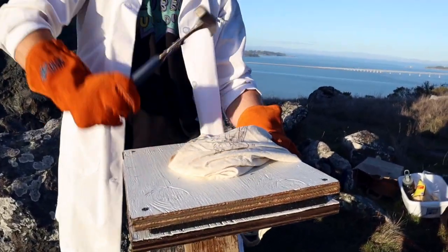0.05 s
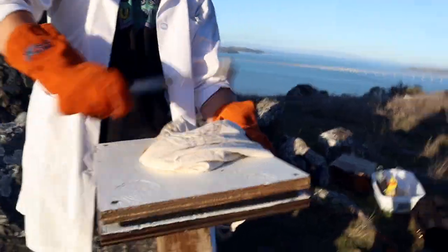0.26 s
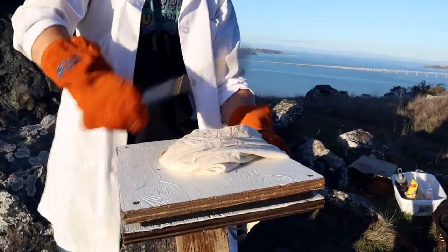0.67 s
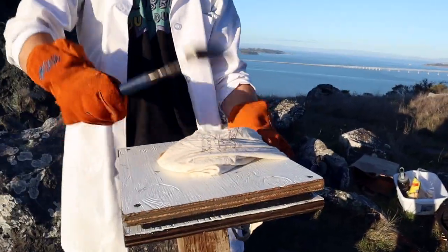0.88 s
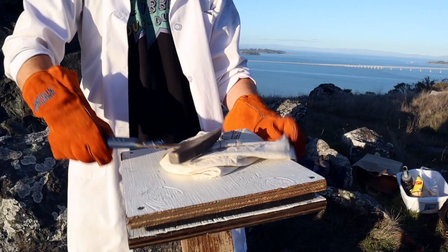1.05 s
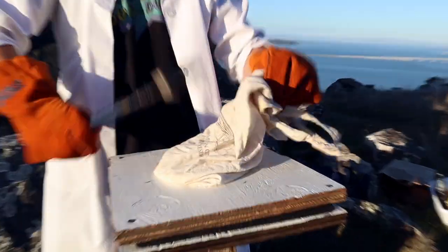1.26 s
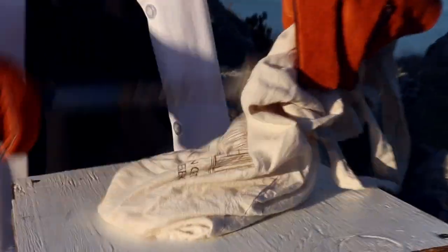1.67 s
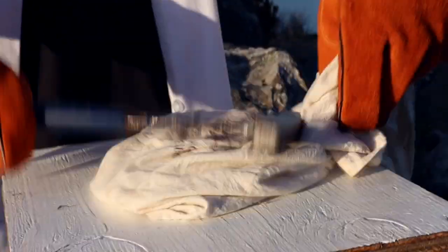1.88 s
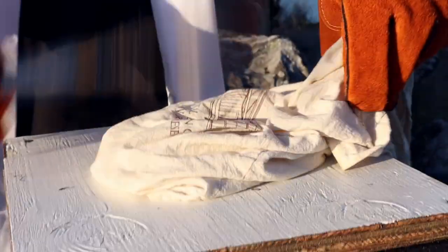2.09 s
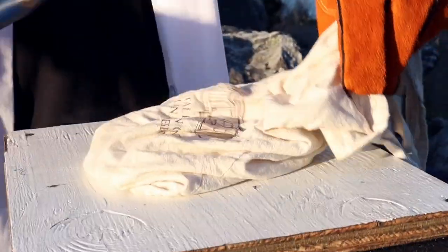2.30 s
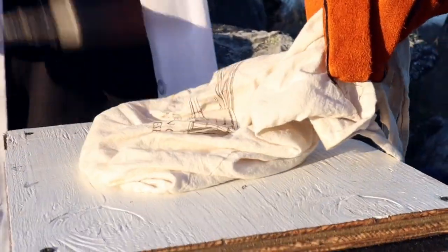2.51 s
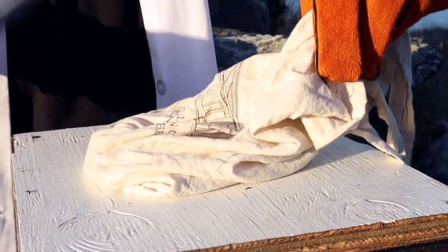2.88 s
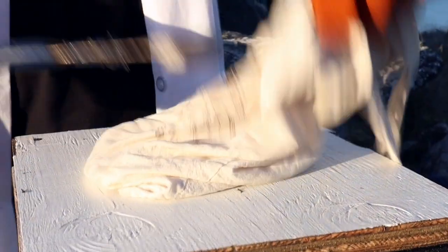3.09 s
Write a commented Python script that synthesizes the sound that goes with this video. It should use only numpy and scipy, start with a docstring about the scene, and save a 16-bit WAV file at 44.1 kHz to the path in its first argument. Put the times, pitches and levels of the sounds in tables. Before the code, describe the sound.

A hammer pounds a cloth bag of hard pieces on wooden boards, close by and outdoors. Eleven blows fall evenly from 0.2 to 3.0 seconds, about 0.28 seconds apart, the one at 1.9 much softer. Each is a wooden thud with a slight crunch and brief rattle; at 1.1 the steel head clinks. Faint wind brushes the microphone at the start, and cloth rustles softly near 3.2.

```python
"""Hammering a bag on boards.

Outdoors, a hammer pounds a cloth bag of hard pieces on stacked wooden boards, eleven times.
Each blow rings the boards and crunches the contents; the boards slap back and shudder,
the rocky ground echoes and loose pieces settle. Light wind brushes the microphone,
and the cloth rustles at the end."""
import sys
import numpy as np
from scipy import signal
from scipy.fft import rfft, irfft, next_fast_len
from scipy.io import wavfile

SR = 44100
rng = np.random.default_rng(int(sys.argv[2]) if len(sys.argv) > 2 else 0)


def generate_wav(sig):
    """Save sig (samples, or channels by samples) to the path in sys.argv[1] as 16-bit PCM at SR."""
    pcm = np.round(np.clip(np.atleast_2d(sig).T, -1, 1) * 32767).astype(np.int16)
    wavfile.write(sys.argv[1], SR, pcm)


N = 143325
TIME_S = np.arange(N) / SR


def from_db(db):
    """Decibels to gain."""
    return 10 ** (np.asarray(db) / 20)


def unit_rms(x):
    """Scale to rms 1."""
    return x / np.sqrt(np.mean(x ** 2) + 1e-20)


def envelope(points):
    """Gain over time from t/s, level/dB points."""
    return from_db(np.interp(TIME_S, *np.transpose(points)))


def noise(spectrum, grain_db=0):
    """Shaped noise, rms 1; grain_db roughens it into a crackle."""
    hz, db = np.transpose(spectrum)
    white = rng.standard_normal(N)
    grains = np.repeat(rng.standard_normal(N // 16 + 1), 16)[:N].clip(-2, 2)
    size = next_fast_len(N)
    bins_hz = np.arange(size // 2 + 1) * SR / size
    gain = from_db(np.interp(np.log(bins_hz + 1), np.log(hz), db))
    return unit_rms(irfft(rfft(white * from_db(grain_db * grains), size) * gain, size)[:N])


def burst(start_s, attack_s, decay_s):
    """Linear attack, exponential decay."""
    age_s = TIME_S - start_s
    return np.clip(age_s / attack_s, 0, 1) * np.exp(-np.clip((age_s - attack_s) / decay_s, 0, 40))


def clicks(times_s, levels_db):
    """One impulse at each time."""
    out = np.zeros(N)
    samples = (np.atleast_1d(times_s) * SR).astype(int)
    np.add.at(out, samples.clip(0, N - 1), from_db(levels_db))
    return out


def ring(drive, hz, t60_s):
    """One mode: a unit impulse starts a decaying unit sine."""
    radius = from_db(-60 / (t60_s * SR))
    angle = 2 * np.pi * hz / SR
    return signal.lfilter([0, np.sin(angle)], [1, -2 * radius * np.cos(angle), radius ** 2], drive + 1e-18)


def radiate(mode, hz, min_cut_hz=0):
    """High-pass: a mode radiates little far below its pitch."""
    return signal.sosfilt(signal.butter(2, max(min_cut_hz, 0.16 * hz), "high", fs=SR, output="sos"), mode)


# Hammer contacts, two blows double: t/s, thump/dB, body/dB, knock/dB, crack/dB, favoured f/Hz,
# boost/dB, clack f/Hz, clack/dB, crunch/dB, crunch rise/s, crunch decay/s
CONTACTS = [ (0.2157, -19.5, -3, -4.5, 11, 480, -38, 2580, -7.5, -9.5, 0.00072, 0.0028),
            (0.2191, -1, -5, 1, -19.5, 1130, 9, 1443, -4, -18.5, 0.00048, 0.00084),
            (0.4994, -8, -5, 2.5, -2, 233, 9, 1754, 0.5, -16, 0.00059, 0.005),
            (0.7942, 1, -0.5, -7, -15.5, 410, 10.5, 3100, -9, -7, 0.00046, 0.0019),
            (1.083, -4.5, -5.5, 2.5, 4.5, 702, 9.5, 1546, -7.5, -8, 0.001, 0.0013),
            (1.3750, -10, 5.5, -6.5, 4, 410, 7, 844, -1.5, -20, 0.00072, 0.0041),
            (1.6540, -12.5, -4, -4, -7, 800, -5, 1900, -15.5, -16, .0005, 0.0014),
            (1.6622, -12.5, -3.5, 3, -14.5, 1160, 5.5, 1650, -11, -15, 0.00074, 0.00083),
            (1.9212, -16.5, -29, -21.5, -21.5, 550, 7.5, 5640, -30.5, -30, 0.0063, 0.0043),
            (2.1873, -2, -3.5, 0, -1.5, 640, 3, 2034, -7.5, -17, 0.00039, 0.0034),
            (2.4569, -0.5, -5, 1.5, -10, 822, 9.5, 1565, -6, -15.5, 0.00049, 0.0029),
            (2.7390, 0.5, 8, -7.5, 3.5, 870, 6.5, 2400, -10.5, -17, .0005, 0.0056),
            (3.0275, -3.5, -12.5, -8, -27.5, 1100, -4, 1600, -32.5, -25, 0.00086, 0.0053)]
# Centres of thump, body, knock, crack: f/Hz
REGISTERS_HZ = (150, 450, 950, 2400)
# Modes of the loaded boards: f/Hz, level/dB, t60/s
BOARD_MODES = [(100, -22, 0.31), (140.4, -10, .045), (232, -16, 0.071), (415, -15.5, .03),
               (545, -30.5, .07), (611, -16.5, 0.078), (805, -14.5, 0.031), (885.5, -11.5, .025),
               (1130, -10, .022), (1348, -9, 0.015), (1693, -15, 0.036), (2400, -17, 0.0063),
               (3100, -11, 0.0045), (3590, -26, 0.013)]


def boards(max_lag_s=0.0015, favour_octaves=0.25, scatter_db=1.0):
    """Each contact drives the modes with its own balance and favours one pitch, by where it lands."""
    rows = np.array(CONTACTS)
    times_s, registers_db, favoured_hz, boost_db = rows[:, 0], rows[:, 1:5], rows[:, 5], rows[:, 6]
    out = 0
    for hz, db, t60_s in BOARD_MODES:
        balance_db = np.array([np.interp(np.log(hz), np.log(REGISTERS_HZ), row) for row in registers_db])
        favour_db = boost_db * np.exp(-(np.log2(hz / favoured_hz) / favour_octaves) ** 2)
        drive_db = db + balance_db + favour_db + scatter_db * rng.standard_normal(len(rows))
        lag_s = min(max_lag_s, 0.5 / hz) * rng.random(len(rows))
        mode = ring(clicks(times_s + lag_s, drive_db), hz, t60_s)
        out += radiate(mode, hz, min_cut_hz=150)  # small boards: little deep bass
    return out


# Crushed pieces: f/Hz, level/dB
CRUNCH_SPECTRUM = [(200, -10), (600, -3.5), (1500, 1.5), (3200, -5.5), (5200, -12), (7500, -25.5),
                   (11000, -32.5), (16000, -36)]


def contents(cloth_lead_s=0.0037, cloth_db=-12):
    """The cloth squashes, then the piece under the hammer clacks and crunches."""
    grit = noise(CRUNCH_SPECTRUM, grain_db=3.5)
    out = 0
    for t_s, *_, hz, clack_db, crunch_db, rise_s, decay_s in CONTACTS:
        clack = radiate(ring(clicks(t_s, clack_db), hz, t60_s=0.014), hz)
        squash = from_db(cloth_db) * burst(t_s - cloth_lead_s, 0.005, 0.0027)
        crunch = burst(t_s, rise_s, decay_s)
        out += clack + grit * from_db(crunch_db) * (squash + crunch)
    return out


# Blows that ring the head: t/s, level/dB
HEAD_STRIKES = [(.7935, -16), (1.0832, 3.5), (1.375, -13), (2.739, -24)]
# Head modes: f/Hz, level/dB, t60/s
HEAD_MODES = [(3763, -25, .052), (8270, -46, .07)]


def hammer_head():
    """The steel head rings briefly on some blows."""
    times_s, strike_db = np.transpose(HEAD_STRIKES)
    return sum(ring(clicks(times_s, strike_db + db), hz, t60_s) for hz, db, t60_s in HEAD_MODES)


# Board rebounds: t/s, slap/dB, shudder/dB, echo/dB
REBOUNDS = [(0.231, -24.5, -40, -46.5), (0.51, -13.5, -35.5, -46), (0.81, -20, -35, -49),
            (1.094, -23.5, -36, -44.5), (1.385, -25.5, -42.5, -50), (1.669, -24.5, -40, -48.5),
            (1.939, -31.5, -45.5, -49.5), (2.201, -24, -35.5, -45), (2.472, -26.5, -37.5, -50.5),
            (2.755, -20, -35.5, -41.5), (3.043, -20.5, -33.5, -48.5)]
# Board on board: f/Hz, level/dB
SLAP_SPECTRUM = [(70, -25), (110, -21), (300, -4.5), (570, 8), (850, -4.5), (1400, -7), (3000, -20),
                 (6000, -38), (15000, -57.5)]


def slap(decay_s=0.0079):
    """The boards slap together after each blow."""
    gain = sum(from_db(db) * burst(t_s, 0.002, decay_s) for t_s, db, _, _ in REBOUNDS)
    return gain * noise(SLAP_SPECTRUM, grain_db=2)


HUM_HZ, HUM_T60_S = 539, 0.07
# Shuddering boards: f/Hz, level/dB
SHUDDER_SPECTRUM = [(40, -17.5), (108, 5), (170, 3.5), (320, -1.5), (560, -4), (800, -14.5), (1350, -18),
                    (2200, -34.5), (6000, -50), (15000, -60)]


def shudder(decay_s=0.067, hum_db=-5.5):
    """The boards rattle on, one mode humming."""
    gain = sum(from_db(db) * burst(t_s - 0.008, 0.012, decay_s) for t_s, _, db, _ in REBOUNDS)
    hum = from_db(hum_db) * unit_rms(ring(rng.standard_normal(N), HUM_HZ, HUM_T60_S))
    return gain * (noise(SHUDDER_SPECTRUM, grain_db=9.5) + hum)


# Pieces dropping in the bag: t/s, level/dB, f/Hz, board knock/dB
DROPS = [(.039, -41, 1200, -54), (.084, -46, 1800, -58), (.319, -42, 1400, -50), (.528, -26, 1250, -32),
         (.642, -48, 2200, -54), (.851, -39, 2200, -46), (1.159, -33, 1700, -35), (1.201, -33, 1420, -39),
         (1.284, -50, 1420, -56), (1.718, -45, 1400, -50), (2.014, -46, 1600, -46), (2.258, -37, 1450, -39),
         (2.292, -37, 1560, -42), (2.524, -39, 1400, -41), (2.556, -44, 1400, -46), (2.806, -34, 1300, -26),
         (2.887, -48, 1400, -39), (3.089, -39, 1300, -39)]
# Modes of a piece: frequency ratio, level/dB
PIECE_MODES = [(.78, -7), (1, 0), (1.2, -9)]
# Grit of a drop: f/Hz, level/dB
DROP_SPECTRUM = [(150, 10.5), (550, 17), (850, 7), (1500, -6), (3000, -16.5), (6000, -27.5), (15000, -60.5)]


def settling(muffle_hz=2600):
    """Gritty knocks, each ringing one piece and the board under it, muffled by the cloth."""
    grit = noise(DROP_SPECTRUM, grain_db=6.5)
    out = 0
    for t_s, db, hz, board_db in DROPS:
        out += from_db(db) * grit * burst(t_s, 0.0013, 0.007)
        out += ring(clicks(t_s, board_db), HUM_HZ, HUM_T60_S)
        for k, (ratio, mode_db) in enumerate(PIECE_MODES):
            out += (-1) ** k * ring(clicks(t_s, db + mode_db), hz * ratio, t60_s=0.036)
    return signal.sosfilt(signal.butter(2, muffle_hz, fs=SR, output="sos"), out)


def trickle(rate_per_s=360, spread_db=4, re_shudder_db=-18, decay_s=0.041):
    """Crumbs shift after each blow and come to rest."""
    gain = sum(from_db(db + re_shudder_db) * burst(t_s + 0.03, 0.035, decay_s)
               for t_s, _, db, _ in REBOUNDS)
    grains = (rng.random(N) < rate_per_s / SR) * rng.choice([-1, 1], N)
    grains = grains * from_db(spread_db * rng.standard_normal(N).clip(-2, 2))
    pitches_hz = np.geomspace(900, 3200, 12)
    pitch_index = rng.integers(0, len(pitches_hz), N)
    crumbs = sum(ring(grains * (pitch_index == k) / hz, hz, t60_s=0.043) for k, hz in enumerate(pitches_hz))
    return gain * unit_rms(crumbs)


# Return from the rocks: f/Hz, level/dB
ECHO_SPECTRUM = [(150, 0.5), (550, 10.5), (900, -0.5), (2000, -9), (4000, -16.5), (6000, -17.5),
                 (9000, -27), (15000, -32.5)]


def rock_echo(delay_s=0.045, decay_s=0.023):
    """The rocky ground scatters each blow back as a noise burst."""
    gain = sum(from_db(db) * burst(t_s + delay_s, 0.002, decay_s) for t_s, _, _, db in REBOUNDS)
    return gain * noise(ECHO_SPECTRUM, grain_db=4.5)


# Fabric snapping taut: t/s, level/dB
SNAPS = [(.134, -50), (.141, -42), (2.154, -55), (2.437, -45)]
# Snap: f/Hz, level/dB
SNAP_SPECTRUM = [(700, -20), (1500, -3), (2400, 0), (4500, -3), (8000, -8), (11000, -25), (16000, -35)]
# Bag shifting: t/s, level/dB
SHIFT_ENVELOPE = [(0, -49), (.15, -55.5), (.42, -73), (.58, -48), (.75, -69), (.9, -52), (1.05, -62.5),
                  (1.3, -59.5), (1.6, -82.5), (3.25, -77.5)]
# Shift: f/Hz, level/dB
SHIFT_SPECTRUM = [(150, 16), (500, 14.5), (1300, 6), (2500, -6), (6000, -22.5), (9000, -29), (15000, -41.5)]
# Fabric sliding: t/s, level/dB
RUSTLE_ENVELOPE = [(3.0, -75), (3.13, -72), (3.2, -54.5), (3.25, -59)]
# Rustle: f/Hz, level/dB
RUSTLE_SPECTRUM = [(400, 6), (1500, 5.5), (3000, 5), (5800, 5.5), (8500, -6), (15000, -2)]


def cloth():
    """A gloved hand shifts the bag and snaps it taut; the fabric slides at the end."""
    snaps = sum(from_db(db) * burst(t_s, 0.00024, 0.0013) for t_s, db in SNAPS) * noise(SNAP_SPECTRUM)
    shift = envelope(SHIFT_ENVELOPE) * noise(SHIFT_SPECTRUM, grain_db=9.5)
    rustle = envelope(RUSTLE_ENVELOPE) * noise(RUSTLE_SPECTRUM, grain_db=-1)
    return snaps + shift + rustle


# Gusts: t/s, level/dB
WIND_ENVELOPE = [(0, -43.5), (.12, -45), (.21, -32), (.3, -40), (.45, -54), (.65, -51), (.78, -51.5),
                 (1.0, -56.5), (1.3, -60.5), (3.25, -57)]
# Wind rumble: f/Hz, level/dB
WIND_SPECTRUM = [(20, 4), (60, -6.5), (120, -4), (250, -25.5), (600, -44.5), (2000, -71.5)]
# Still air: f/Hz, level/dB
AIR_SPECTRUM = [(20, 2), (100, 0.5), (500, -10), (1000, -15.5), (2000, -26), (3200, -37.5), (6000, -39),
                (10000, -50.5), (15000, -59.5)]


def outdoors(air_db=-69):
    """Still air, and gusts on the microphone."""
    return from_db(air_db) * noise(AIR_SPECTRUM) + envelope(WIND_ENVELOPE) * noise(WIND_SPECTRUM)


def scene():
    """All sources at one close microphone."""
    blows = boards() + contents() + hammer_head()
    aftermath = slap() + shudder() + settling() + trickle() + rock_echo()
    return (blows + aftermath + cloth() + outdoors())[None]


def record(dry):
    """Soft overload on the hardest peaks, then a steep low-pass."""
    ceiling, stopband_hz = 1.03, 16600
    clipped = dry / (1 + (dry / ceiling) ** 8) ** (1 / 8)
    return signal.sosfilt(signal.cheby2(12, 60, stopband_hz, fs=SR, output="sos"), clipped)


dry = scene()
out = record(dry)
generate_wav(out)
```